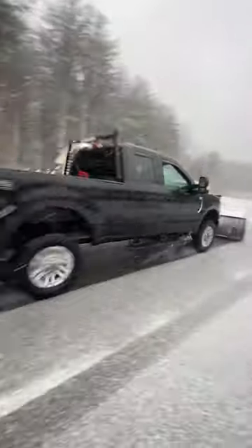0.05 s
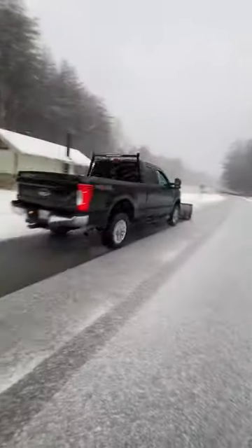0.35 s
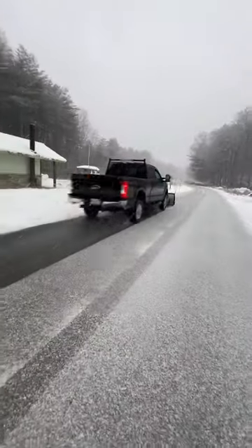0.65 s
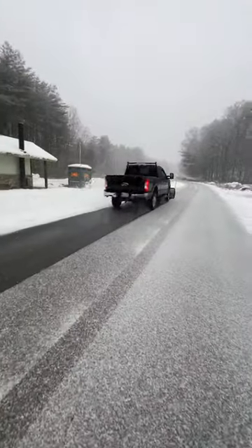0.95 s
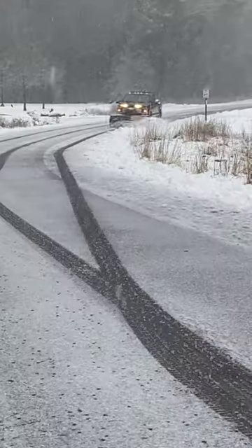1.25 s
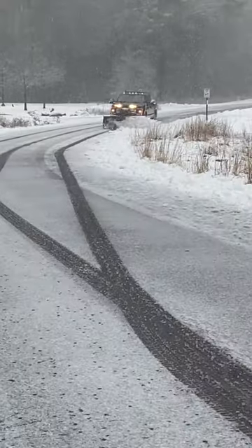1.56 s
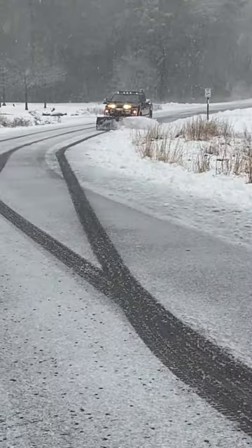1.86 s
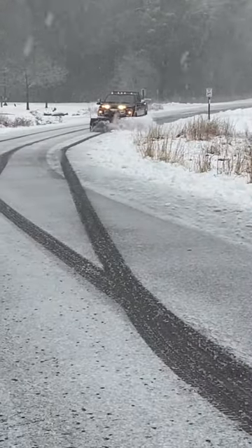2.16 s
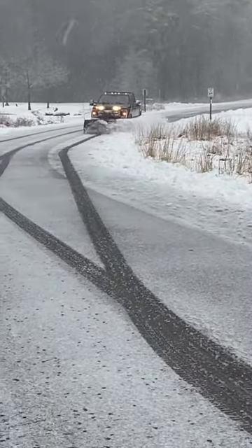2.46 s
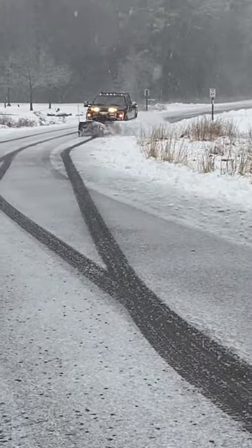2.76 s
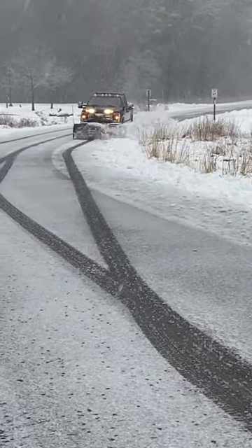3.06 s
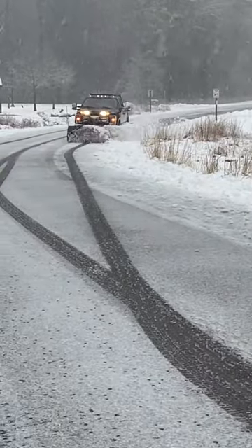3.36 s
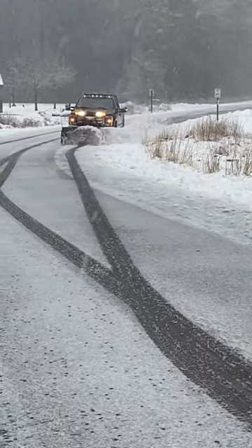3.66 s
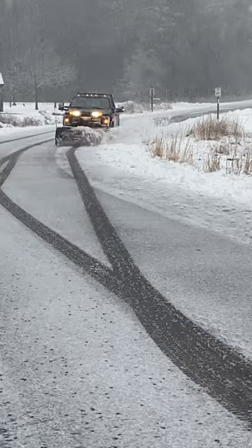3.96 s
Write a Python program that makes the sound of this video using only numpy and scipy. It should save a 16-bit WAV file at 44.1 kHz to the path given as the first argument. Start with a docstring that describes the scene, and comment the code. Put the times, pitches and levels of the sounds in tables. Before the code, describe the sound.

A plow truck drives through slush, first pulling away from close by with hissing tyres and a droning engine. Then, suddenly distant, it hums nearer as gusts bump the microphone and its blade scrapes, clatters and throws slush.

```python
"""Plow pickup on a slushy road

A pickup passes close and pulls away: V8 drone, tyre thumps and roar, and a wet spray that turns hollow.
Hard cut: a far-off engine hums nearer with the blade down. The blade rumbles, throws slush and knocks
as it catches on the road; its edge sticks and slips in a chattering scrape. A few gusts and a wet flake
hit the microphone, over a bed of distant rumble."""
import sys
import numpy as np
from scipy import signal
from scipy.fft import rfft, irfft
from scipy.io import wavfile
from scipy.ndimage import uniform_filter1d

SR = 44100
rng = np.random.default_rng(int(sys.argv[2]) if len(sys.argv) > 2 else 0)


def put_to_file(sound):
    """Save the sound as 16-bit audio at rate SR, in the file named by the first command-line argument."""
    columns = np.atleast_2d(sound).T  # one column per channel
    safe = np.clip(columns, -1, 1)
    whole_steps = np.round(safe * 32767)
    wavfile.write(sys.argv[1], SR, whole_steps.astype(np.int16))


N = 176400
T = np.arange(N) / SR
HZ = np.fft.rfftfreq(N, 1 / SR)
CUT_S = 1.223  # hard cut from the pass to the approach
RECEDE_S = 0.88  # the spray has its far, hollow colour by now

# engine drone: a V8 in the pass, a smoother low hum in the approach
# (time [s], firing rate [Hz], level [dB])
PASS_ENGINE = [(0, 87.1, -38), (.2, 90.2, -35), (.4, 90.5, -26.5), (.58, 88.9, -30.5), (.75, 81.2, -31.5),
               (1.22, 82.9, -37)]
APPROACH_ENGINE = [(1.25, 90.2, -43), (2, 91.4, -40.5), (3.3, 94.7, -41)]
# exhaust tones (multiple of firing rate / firing_order [ratio], relative level [dB])
PASS_ORDERS = [(5, -8), (7, -8.5), (8, -1), (11, -7.5), (21, -10.5), (24, -12.5)]
APPROACH_ORDERS = [(.6, -4), (0.999, 1), (1.398, -3.5)]
# tyre faders (time [s], roar [dB], spray [dB])
TYRE_LEVELS = [(0, -20, -27.5), (.13, -30, -27), (.19, -26.5, -25), (.3, -26, -27.5), (.5, -31, -28),
               (.75, -30, -30.5), (1, -32.5, -30.5), (1.22, -31, -32.5)]
# colours of the tread roar and the near and far spray (frequency [Hz], relative level [dB])
ROAR_EQ = [(25, -34), (50, -3), (120, -3), (220, -0.5), (410, -2.5), (480, -13), (900, -24), (4000, -80)]
SPRAY_NEAR_EQ = [(200, -26), (500, -2), (800, 1.5), (1750, -3.5), (2400, -9.5), (3000, -7), (4300, -10.5),
                 (6200, -12.5), (11000, -23.5), (15500, -24)]
SPRAY_FAR_EQ = [(200, -46), (500, 1.5), (850, 2), (1750, -4.5), (2600, -5), (3150, -14.5), (5300, -14),
                (6300, -16), (11000, -26.5), (15500, -28)]
# wet tread sizzle (time [s], pitch [Hz], level against the spray [dB])
SIZZLE = [(.15, 2580, -12), (.25, 2436, -8.5), (.55, 2290, -14), (.72, 2317, -12), (1.22, 2231, -14)]
# peaks and dips of the departing spray (centre [Hz], width [Hz], left gain [dB], right gain [dB])
HOLLOW_EQ = [(983, 130, -11, -1.5), (1200, 120, 4, -0.5), (1480, 110, -2.5, -5), (2870, 190, -3, 3.5),
             (3730, 260, 5, 0.5), (4893, 160, 5, -4)]
# tyre thumps (time [s], level [dB], pitch [Hz])
THUMPS = [(.001, -23, 286), (0.051, -23.5, 374.5), (0.063, -24.5, 425), (.142, -18, 232.7),
          (.345, -20.5, 243.5), (.455, -26, 273)]
# plow faders (time [s], rumble [dB], scrape [dB], slush hiss [dB])
PLOW_LEVELS = [(1.25, -37, -48, -48.5), (1.55, -38, -47, -46), (1.73, -33.5, -39, -43),
               (1.88, -37, -42, -47), (2.02, -43, -45.5, -46), (2.15, -36.5, -40, -45),
               (2.8, -33, -34, -44.5), (3.02, -33.5, -28, -42), (3.22, -32.5, -31.5, -44.5),
               (3.5, -28.5, -26.5, -42.5), (3.7, -27, -28.5, -42), (3.895, -33, -29.5, -42.5),
               (3.935, -27, -26.5, -41.5)]
# colours of the blade's rumble, scrape, slush and knocks (frequency [Hz], relative level [dB])
RUMBLE_EQ = [(30, -46), (60, -6.5), (130, 4), (250, 1.5), (420, -2), (520, -22), (900, -33), (4000, -94)]
SCRAPE_EQ = [(150, -44), (300, 1), (440, 1.5), (620, 1.5), (900, -4.5), (1400, -10.5), (1750, -23),
             (3000, -61), (6000, -51), (10000, -90)]
SLUSH_EQ = [(400, -10), (1000, 2), (2000, -2), (3100, -2), (3450, -6), (3800, -4.5), (5500, -7), (6200, -9),
            (6950, -16), (7600, -14.5), (11500, -16.5), (15500, -25)]
KNOCK_EQ = [(40, -41), (130, 3), (230, 4), (420, 2), (700, -3.5), (1350, -14), (1900, -30), (5000, -43),
            (9000, -70)]
# blade knocks (time [s], level [dB], treble shelf [dB], decay by 60 dB [s])
KNOCKS = [(1.679, -26.5, -19, 0.081), (2.097, -26, -24, .13), (2.227, -32, -1, 0.2),
          (2.333, -26.5, -9, 0.075), (2.471, -27, -15, 0.2), (3.155, -24.5, -26, 0.14),
          (3.474, -21.5, 16, .09), (3.668, -20.5, 5, 0.15), (3.724, -19.5, 2, 0.085), (3.911, -22, 16, .06),
          (3.974, -19.5, 9.5, 0.17), (3.986, -13, 8, 0.11)]
# groans of the cutting edge (time [s], length [s], pitch [Hz], level [dB])
GROANS = [(2.945, .028, 890, -25), (3.074, 0.053, 235, -24), (3.509, 0.027, 470, -24),
          (3.553, 0.031, 190, -19.5)]
# gusts on the microphone (time [s], length [s], level [dB])
GUSTS = [(1.153, .7, -34), (1.333, 0.09, -31.5), (1.446, 0.053, -32.5), (1.508, 0.046, -27.5),
         (1.551, 0.075, -24)]
# colours of the gusts and the distant road (frequency [Hz], relative level [dB])
WIND_EQ = [(20, -37), (45, 3), (70, -2), (110, -3), (200, -12), (400, -21), (500, -39), (2000, -100)]
DISTANT_EQ = [(30, -35), (55, -21), (135, -2), (230, 0.5), (425, -5), (480, -18), (900, -29), (4000, -88)]
# stereo image: left/right balance, phase and width, with a phasey treble
# (frequency [Hz], left minus right [dB], left lead [rad], coherence [0-1])
PASS_IMAGE = [(55, -.1, -.16, .99), (90, -1, -.2, .996), (170, -2.9, -.03, .995), (350, -1.5, -.35, .99),
              (450, -1.6, -1.15, .95), (600, -13, -2.9, .5), (800, -11, -6, .86), (1100, -10, -5.4, .78),
              (1500, -3.5, -5.9, .93), (2300, -2, -6.2, .92), (3100, -8, -7.1, .35), (4000, -1, -10, .6),
              (5200, -1, -11.7, .87), (7200, 0, -9.5, .72), (11000, 0, -6.3, .8), (13000, 0, -3.6, .8)]
PLOW_IMAGE = [(55, 0, -.02, .998), (250, -1.1, -.11, .998), (350, -.2, -.26, .988), (450, -2, -.55, .985),
              (600, -6.2, -.27, .98), (900, -4.1, -.03, .97), (1550, -1.8, -.22, .95), (2300, .4, .5, .95),
              (5300, 0, .5, .95), (6900, 0, 2.9, .87), (9000, 0, 4.5, .8), (10800, 0, 6.2, .9),
              (13000, 0, 9, .85)]


def tyres():
    """Low tread roar under a wet spray that crossfades from its near to its far colour."""
    roar = rush(ROAR_EQ, grains_per_s=240, spread_db=1.5, grain_share=0.17,
                patchy_db=1.33, flutter_db=0.45, flutter_hz=25)
    near = rush(SPRAY_NEAR_EQ, grains_per_s=2500, spread_db=2.0, grain_share=0.34,
                patchy_db=1.5, flutter_db=0.75, flutter_hz=49)
    far = rush(SPRAY_FAR_EQ, grains_per_s=3000, spread_db=3.5, grain_share=0.42,
               patchy_db=1.5, flutter_db=1.1, flutter_hz=50)
    away = np.clip(T / RECEDE_S, 0, 1)
    spray = np.sqrt(1 - away) * near + np.sqrt(away) * far + sizzle()
    return roar * amp(curve(TYRE_LEVELS, 1)) + spray * amp(curve(TYRE_LEVELS, 2))


def sizzle(whistle_hz=5060, whistle_db=-17.5):
    """The tread squeezes out water: a narrow hiss slides down while a thin whistle fades in above it."""
    def band(hz, width_hz):
        noise = irfft(rfft(rng.standard_normal((2, N))) / (1 + (HZ / width_hz) ** 2), N)
        turns = np.cumsum(hz * (1 + .012 * wander(22))) / SR
        return unit(noise * np.cos(2 * np.pi * turns))
    hiss = band(curve(SIZZLE, 1), width_hz=147) * amp(curve(SIZZLE, 2))
    whistle = band(whistle_hz, width_hz=230) * amp(whistle_db)
    return hiss + whistle * np.minimum(T / RECEDE_S, 1)


def thumps(swell_s=0.012):
    """Bumps in the road swell the hollow ring of a tyre."""
    out = np.zeros((2, N))
    for start, db, hz in THUMPS:
        swell = np.maximum(T - start, 0) / swell_s
        out[0] += amp(db) * swell * np.exp(1 - swell) * np.sin(2 * np.pi * (hz * T + rng.random()))
    return out


def engine(track, orders, firing_order, waver, throb_db=0.5):
    """Exhaust tones locked to a wavering firing rate, each throbbing on its own."""
    firing_hz = curve(track, 1) * (1 + waver * wander(13.5))
    turns = np.cumsum(firing_hz) / SR / firing_order
    tones = sum(amp(db + throb_db * wander(7.1)) * np.cos(2 * np.pi * (order * turns + rng.random()))
                for order, db in orders)
    return np.sqrt(2) * amp(curve(track, 2)) * np.array([tones, np.zeros(N)])


def plow(chatter_share=0.38, brighten_db_per_s=6):
    """The blade rumbles and scrapes along the road and throws slush; the hiss opens up as it nears."""
    rumble = rush(RUMBLE_EQ, grains_per_s=200, spread_db=1.0, grain_share=0.22,
                  patchy_db=-0.04, flutter_db=2.0, flutter_hz=28.2)
    grit = rush(SCRAPE_EQ, grains_per_s=500, spread_db=3.0, grain_share=0.33,
                patchy_db=2.0, flutter_db=0.0, flutter_hz=45)
    scrape = np.sqrt(1 - chatter_share) * grit + np.sqrt(chatter_share) * chatter()
    slush = rush(SLUSH_EQ, grains_per_s=4000, spread_db=4.0, grain_share=0.19,
                 patchy_db=0.8, flutter_db=0.77, flutter_hz=35, treble_db=brighten_db_per_s * (T - T[-1]))
    return (rumble * amp(curve(PLOW_LEVELS, 1))
            + scrape * amp(curve(PLOW_LEVELS, 2))
            + slush * amp(curve(PLOW_LEVELS, 3)))


def chatter(low_hz=295.7, high_hz=1465, pitches=24, slips_per_s=350, decay_cycles=5, spread_db=1.6):
    """The cutting edge sticks and slips: brief, damped rings at many pitches."""
    out, age = np.zeros((2, N)), T[:SR // 10]
    for hz in np.geomspace(low_hz, high_hz, pitches):
        ring = np.exp(-age * hz / decay_cycles) * np.sin(2 * np.pi * hz * rng.uniform(0.98, 1.02) * age)
        slips = rng.random(N) < slips_per_s / pitches / SR
        force = amp(spread_db * np.minimum(rng.exponential(1, N), 3))
        out += hz * signal.oaconvolve(slips * force, ring)[:N] * rng.choice([-1, 1], (2, 1))
    return colour(out, across(SCRAPE_EQ))


def knocks(attack_s=0.0006):
    """The blade catches on the road: short, damped clatters."""
    out = np.zeros((2, N))
    shelf = np.clip(np.log2((HZ + 1) / 350) / 2, 0, 1)  # climbs over two octaves from 350 Hz
    for start, db, treble_db, t60 in KNOCKS:
        age = np.maximum(T - start, 0)
        envelope = np.minimum(age / attack_s, 1) * amp(-60 * age / t60)
        out += amp(db) * burst(envelope, across(KNOCK_EQ) + treble_db * shelf)
    return out


def groans(glide=0.099):
    """The cutting edge drags for a moment and rings, bending up in pitch as it loads."""
    out = np.zeros((2, N))
    for start, length, hz, db in GROANS:
        progress = np.clip((T - start) / length, 0, 1)
        turns = np.cumsum(hz * (1 + glide * (progress - .5))) / SR + rng.random()
        out[0] += amp(db) * np.sin(np.pi * progress) ** 2 * np.sin(2 * np.pi * turns)
    return out


def wind():
    """Gusts buffet the microphone with brief, bassy puffs."""
    out = np.zeros((2, N))
    for start, length, db in GUSTS:
        envelope = np.sin(np.pi * np.clip((T - start) / length, 0, 1)) ** 2
        out += amp(db) * burst(envelope, across(WIND_EQ))
    return out


def flake(start_s=1.756, level_db=-50, t60_s=.009):
    """A wet flake ticks against the microphone."""
    age = np.maximum(T - start_s, 0)
    return amp(level_db - 60 * age / t60_s) * (age > 0) * rng.standard_normal((2, N))


def distant_road(level_db=-39):
    """A steady bed of far-off road rumble."""
    return amp(level_db) * colour(rng.standard_normal((2, N)), across(DISTANT_EQ))


def receding(pair, notch_near_hz=4930, notch_far_hz=3170, notch_width_hz=120, notch_db=-3.5):
    """The spray turns hollow as the truck leaves: peaks and dips deepen, and a notch sweeps down."""
    hz, t, spectrum = signal.stft(pair, SR, nperseg=1024)
    hz, away = hz[:, None], np.minimum(t / RECEDE_S, 1)
    eq_db = sum(np.array([left, right])[:, None, None] * away * np.exp(-((hz - centre) / width) ** 2)
                for centre, width, left, right in HOLLOW_EQ)
    notch_hz = notch_far_hz + (notch_near_hz - notch_far_hz) * (1 - away) ** 2
    eq_db += notch_db * np.exp(-((hz - notch_hz) / notch_width_hz) ** 2)
    return signal.istft(spectrum * amp(eq_db), SR)[1][:, :N]


def stereo(layers, image):
    """Spreads a direct part (row 0) and a diffuse part (row 1) over left and right."""
    direct, diffuse = rfft(layers)
    balance, lead = amp(across(image, 1)), across(image, 2)
    coherence = np.clip(across(image, 3), 0, 1)
    direct = direct * np.sqrt((1 + coherence) / 2)
    diffuse = diffuse * np.sqrt((1 - coherence) / 2)
    pair = np.array([(direct + diffuse) * balance * np.exp(1j * lead), direct - diffuse])
    return irfft(pair * np.sqrt(2 / (1 + balance ** 2)), N)


def rush(eq, grains_per_s, spread_db, grain_share, patchy_db, flutter_db, flutter_hz, treble_db=0):
    """Countless tiny impacts over a wash, in drifting patches; treble_db rides the gain at 10 kHz."""
    sizes = amp(spread_db * np.minimum(rng.exponential(1, N), 4)) * rng.choice([-1, 1], N)
    grains = unit(sizes * (rng.random(N) < grains_per_s / SR))
    wash = rng.standard_normal((2, N))
    grain_pair = np.array([grains, grains * rng.choice([-1, 1], N)])
    texture = np.sqrt(1 - grain_share) * wash + np.sqrt(grain_share) * grain_pair
    texture = colour(texture * amp(flutter_db * wander(flutter_hz)), across(eq))
    hz, t, spectrum = signal.stft(texture, SR, nperseg=512)
    speckle = rng.standard_normal(spectrum.shape[1:])
    patches = unit(uniform_filter1d(uniform_filter1d(speckle, size=6, axis=0), size=6, axis=1))
    tilt_db = np.minimum(hz[:, None] / 10000, 1.2) ** 2 * np.interp(t, T, treble_db + np.zeros(N))
    return unit(signal.istft(spectrum * amp(patchy_db * patches + tilt_db), SR)[1][:, :N])


def burst(envelope, eq_db):
    """A hit of coloured noise, each row carrying the energy of the envelope."""
    noise = envelope * colour(rng.standard_normal((2, N)), eq_db)
    return noise * np.linalg.norm(envelope) / np.linalg.norm(noise, axis=1, keepdims=True)


def wander(rate_hz):
    """Smooth random modulation of rms 1."""
    return unit(irfft(rfft(rng.standard_normal(N)) * np.exp(-(HZ / rate_hz) ** 2), N))


def colour(x, eq_db):
    """Applies an EQ curve and scales to rms 1."""
    return unit(irfft(rfft(x) * amp(eq_db), N))


def curve(table, column):
    """One column of a table over time."""
    rows = np.array(table)
    return np.interp(T, rows[:, 0], rows[:, column])


def across(table, column=1):
    """One column of a table over log frequency."""
    rows = np.array(table)
    return np.interp(np.log(HZ + 1), np.log(rows[:, 0] + 1), rows[:, column])


def amp(db):
    """Decibels to gain."""
    return 10 ** (np.asarray(db) / 20)


def unit(x):
    """Scales to rms 1."""
    return x / np.sqrt(np.mean(x ** 2) + 1e-20)


def scene():
    """The close pass, then a hard cut to the approach with the blade down."""
    passing = engine(PASS_ENGINE, PASS_ORDERS, firing_order=8, waver=0.0045) + tyres() + thumps()
    approach = (engine(APPROACH_ENGINE, APPROACH_ORDERS, firing_order=0.99, waver=0.0074)
                + plow() + knocks() + groans() + wind() + distant_road())
    cut = np.clip((T - CUT_S) / 0.0022 + .5, 0, 1)  # 2.2 ms crossfade
    return (1 - cut) * receding(stereo(passing, PASS_IMAGE)) + cut * stereo(approach, PLOW_IMAGE) + flake()


def record(dry):
    """A millisecond fade at each end and a steep high cut at 15850 Hz."""
    faded = dry * np.clip(np.minimum(T, T[-1] - T) / .001, 0, 1)
    high_cut = signal.firwin(511, 15850, window=("kaiser", 9), fs=SR)
    return signal.oaconvolve(faded, high_cut[None], "same")


dry = scene()
out = record(dry)
put_to_file(out)
```